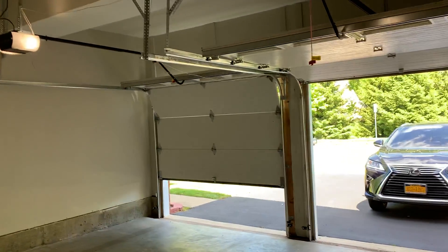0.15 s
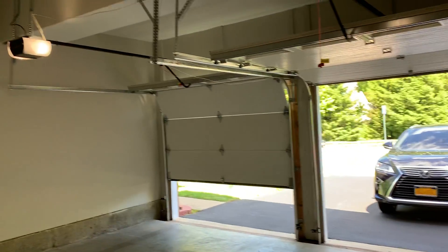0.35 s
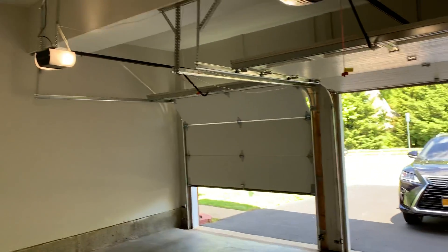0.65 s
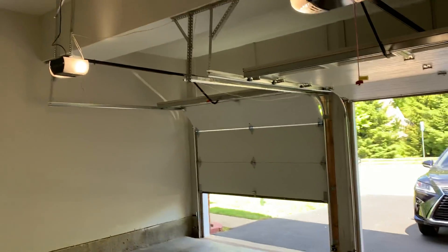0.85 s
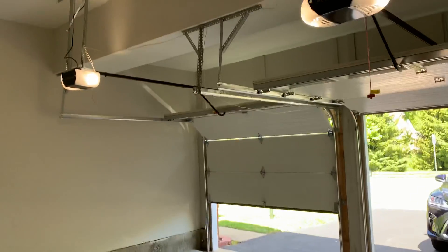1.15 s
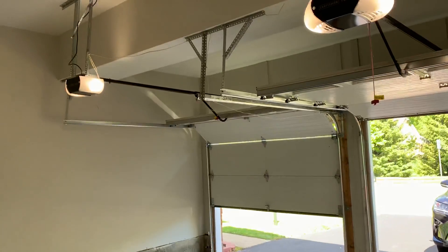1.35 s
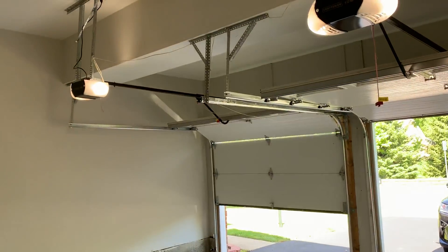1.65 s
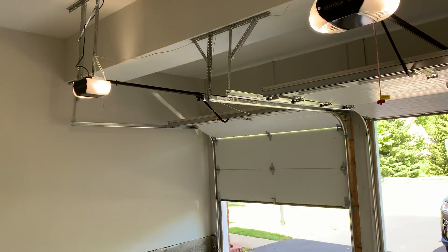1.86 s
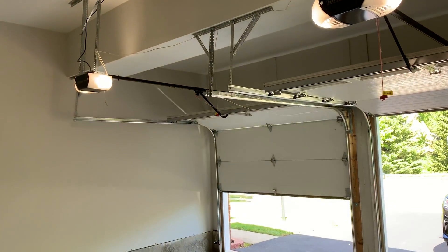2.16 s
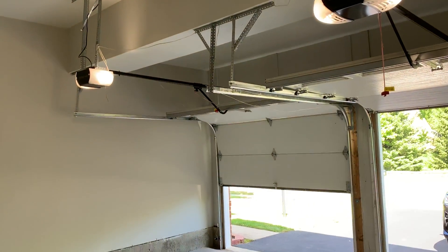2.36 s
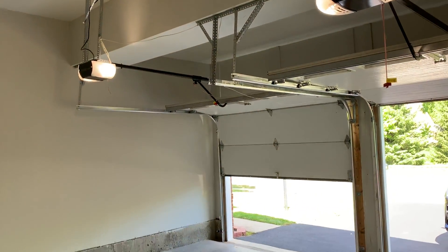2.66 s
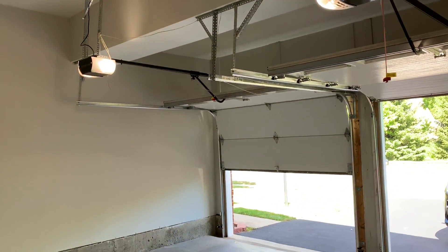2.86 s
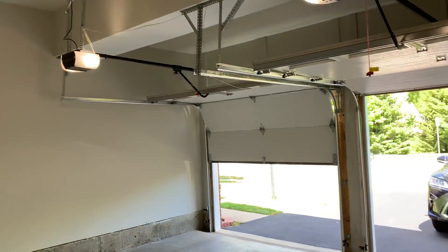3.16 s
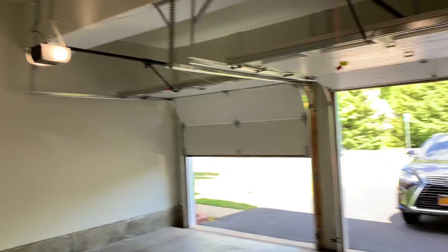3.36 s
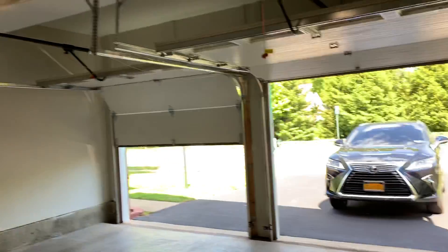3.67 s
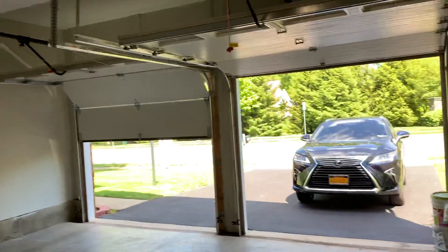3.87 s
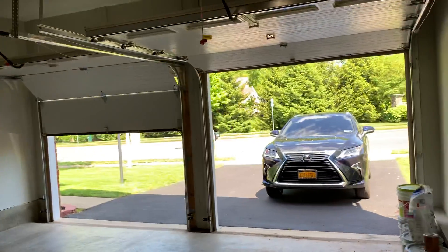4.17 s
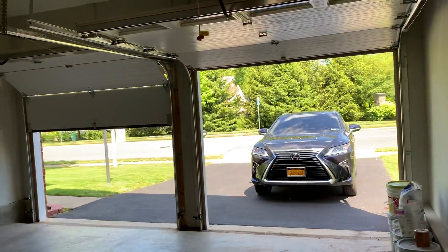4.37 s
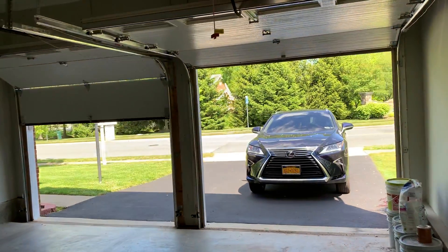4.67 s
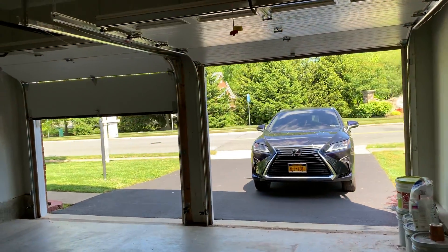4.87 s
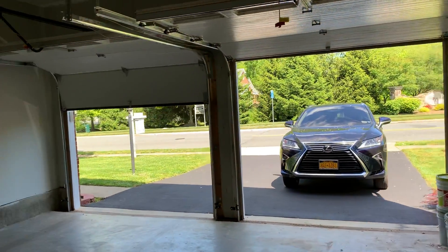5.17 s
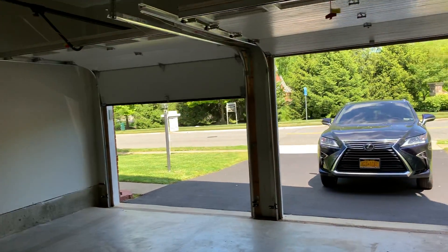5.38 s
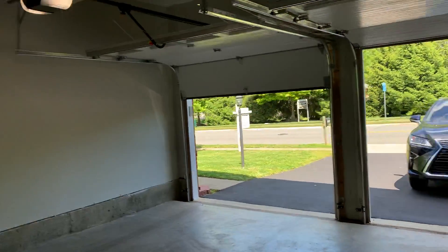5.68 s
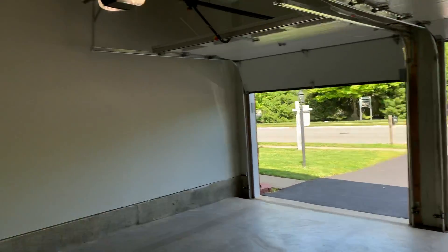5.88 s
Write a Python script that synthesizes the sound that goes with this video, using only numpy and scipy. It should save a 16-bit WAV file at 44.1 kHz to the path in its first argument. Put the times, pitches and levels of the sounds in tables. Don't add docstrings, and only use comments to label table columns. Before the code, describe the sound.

Inside a bare concrete garage, an electric opener drones on a steady low hum as a sectional door rolls upward. Rollers and track rumble with a fast throb and shuddering metallic hiss. Panels clack early, in the middle and late; a dry hinge squeals with a rising pitch around two seconds. The handheld stereo microphone turns, and the hum swells noticeably toward the end.

```python
import sys
import numpy as np
from scipy import signal
from scipy.fft import rfft, irfft, next_fast_len
from scipy.io import wavfile
from scipy.ndimage import uniform_filter1d

SR = 44100
rng = np.random.default_rng(int(sys.argv[2]) if len(sys.argv) > 2 else 0)


def unload_audio(sound):
    columns = np.transpose(np.atleast_2d(sound))
    steps = np.round(np.clip(columns, -1, 1) * 32767)
    wavfile.write(sys.argv[1], SR, steps.astype(np.int16))


def nominal_scale(level):
    x = np.asarray(level, float) / 20
    return 10 ** x


N = 266364
TIME, SIZE = np.arange(N) / SR, next_fast_len(N)
FREQ = np.fft.rfftfreq(SIZE, 1 / SR)


def unit(x):
    return x / np.sqrt(np.mean(x ** 2))


def on_log(table, hz):
    points_hz, values = np.transpose(table)
    return np.interp(np.log(np.maximum(hz, 1)), np.log(points_hz), values)


def columns(table):
    at_s, *rest = np.transpose(table)
    return [np.interp(TIME, at_s, column) for column in rest]


def walk(rate_hz):
    hold = int(SR / rate_hz)
    levels = np.repeat(rng.standard_normal(N // hold + 1), hold)
    slewed = uniform_filter1d(uniform_filter1d(levels, hold), hold)
    return 1.3 * slewed[:N]


def band(x, lo_hz, hi_hz):
    return signal.sosfilt(signal.butter(2, [lo_hz, hi_hz], "bandpass", fs=SR, output="sos"), x)


def motor(teeth):
    # start_s, hum_db, left_minus_right_db, place_half_waves (of the 2nd partial)
    phone = [(0.0, -23.5, -1.5, -.06), (.22, -22.3, -3.5, -.08), (.5, -27.5, -4.5, -.05),
             (.75, -28, 5, .07), (1.15, -24.5, 5, .12), (1.75, -23, 4.2, .3), (2.3, -22, 4.5, .5),
             (2.6, -21, 3.5, .66), (3.12, -24, 6, .76), (3.28, -22, 4.5, .81), (3.46, -24, 6, .84),
             (3.62, -21.3, 4.5, .86), (4.1, -22.5, 4, .875), (4.4, -20.5, 3, 1.0), (4.88, -15.5, 1.5, 1.14),
             (5.35, -14.5, 1, 1.5), (5.65, -14, 1, 1.72), (6.04, -13.6, .7, 1.92)]
    # multiple, level_db
    hum_upper = [(4, -55), (5, -52), (6, -53)]
    hum_hz = 119.9
    second_db, second_leak, second_pan = -29.5, 0.1, 0.54
    third_db, third_walk_db, third_leak = -37.5, 2, .42
    third_crest, third_span = .87, .14

    first_db, pan_db, place = columns(phone)
    third_wave = third_leak + (1 - third_leak) * np.exp(-((place - third_crest) / third_span) ** 2)
    turn = 2 * np.pi * hum_hz * TIME + 0.024 * walk(2.92) + np.array([[0], [.25]])
    side_db = np.array([pan_db, -pan_db]) / 2
    hum = nominal_scale(first_db + side_db) * (1 + 0.045 * teeth) * np.cos(turn)

    second = np.sin(np.pi * place) * np.cos(2 * turn) + second_leak * np.sin(2 * turn)
    hum += nominal_scale(second_db + second_pan * side_db) * (1 + 0.1 * teeth) * second

    third_level = nominal_scale(third_db + third_walk_db * walk(5)) * third_wave * (1 + 0.62 * teeth)
    hum += third_level * np.cos(3 * turn + 1.1 * walk(9))

    for multiple, level_db in hum_upper:
        level = nominal_scale(level_db + 2.5 * walk(4))
        hum += level * np.cos(multiple * turn + .7 * np.array([walk(5), walk(5)]))
    return -np.sqrt(2) * hum


def sprocket():
    sprocket_hz = 14.2
    return np.cos(2 * np.pi * sprocket_hz * TIME + .6 * walk(2))


def travel(teeth):
    # freq_hz, density_db_per_hz
    rolling = [(22, -30), (40, -5), (58, 1), (85, -1.9), (170, -3.5), (300, 1.35), (480, -4.5), (900, -7),
               (1800, -9.5), (3000, -15.5), (5000, -22), (7300, -29.5), (10300, -31.5), (15000, -37)]
    # freq_hz, width_hz, gain_db
    door = [(29.8, 10, 3), (100.5, 11, 6), (130, 38.7, 15.5), (240, 54, 9), (380, 30, 6.5), (630, 104, 3.5),
            (724, 43, 5), (1102, 300, 3.5), (3150, 550, 1), (6570, 600, 3.5), (8670, 1660, 6.5)]
    # start_s, load_db
    load = [(0.0, 1), (.15, -.5), (.36, -3.5), (.53, 2.5), (.85, -0.5), (1.5, 0), (1.76, 3.5), (1.95, 1.3),
            (2.3, 1.5), (2.9, -0.4), (3.42, 1), (3.8, -1), (4.1, -1), (4.4, 1.5), (4.85, -1), (5.15, -0.5),
            (5.6, -1), (6.04, 2)]
    roll_db, rail_rest_db, sprocket_depth = -37.5, -3, .13
    boom_share, scrape_share, hiss_share = 0.51, 0.64, 0.9
    shudder_scrape = 0.15

    (load_db,) = columns(load)
    rail_db = shudder() + rail_rest_db
    burst_db = 1.28 * rng.standard_normal(N // 32 + 1).repeat(32)[:N]
    grit = rng.standard_normal((2, N)) * nominal_scale(burst_db)
    grit += nominal_scale(-9) * rattle(count=2000)

    body_db = on_log(rolling, FREQ)
    for hz, width_hz, gain_db in door:
        body_db = body_db + gain_db / (1 + (2 * (FREQ - hz) / width_hz) ** 2)
    shaken = rfft(grit, SIZE) * nominal_scale(body_db)
    scale = np.std(irfft(shaken * ((FREQ > 420) & (FREQ < 1000)), SIZE))

    throb = sprocket_depth * (teeth + 0.16 * (2 * teeth ** 2 - 1))
    chatter_db = walk(8)
    octave, out = np.log2(np.maximum(FREQ, 1)), 0
    for centre in np.arange(4.5, 14.6, 1):
        window = np.cos(np.pi / 2 * np.clip(octave - centre, -1, 1)) ** 2
        part = irfft(shaken * window, SIZE)[:, :N]
        knots = [6.5, 8.5, 11, 12.5]
        boom = np.interp(centre, knots, [1, 0, 0, 0])
        scrape = np.interp(centre, knots, [0, 0, 1, 0])
        hiss = np.interp(centre, knots, [0, 0, 0, 1])
        share = 1 + boom * (boom_share - 1) + scrape * (scrape_share - 1) + hiss * (hiss_share - 1)
        tilt_db = share * load_db + (hiss + shudder_scrape * scrape) * rail_db
        flicker_db = (0.91 + 0.92 * hiss) * walk(9) + hiss * chatter_db
        throbbing = 1 + (hiss + 0.31 * scrape) * throb
        out = out + part * nominal_scale(roll_db + tilt_db + flicker_db) * throbbing
    return out / scale


def shudder():
    # start_s, rise_s, strength_db
    shudders = [(.05, 0.28, 10.5), (.6, .1, 4.5), (1.35, 0.16, 3.5), (1.7, 0.03, 3), (1.95, 0.16, 3.5),
                (2.15, 0.084, 3.5), (2.8, 0.066, 0), (3.15, 0.07, 5), (3.62, 0.068, 3), (3.975, .01, 10.5),
                (4.2, 0.13, 3), (4.36, 0.036, 2.5), (4.58, 0.034, 0.5), (5.15, 0.11, 1.5),
                (5.45, 0.27, 5.5)]
    total_db, fall_s = 0, 0.11
    for start_s, rise_s, strength_db in shudders:
        build = np.clip((TIME - start_s) / rise_s, 0, 1)
        decay = np.exp(-np.maximum(TIME - start_s - rise_s, 0) / fall_s)
        total_db = total_db + strength_db * build * decay
    return total_db


def rattle(count):
    place, pitch, size, *phases = rng.random((count, 5)).T
    age_s = np.arange(2600) / SR
    swell = np.sin(np.pi * age_s / age_s[-1]) ** 2
    starts, ring_hz = (place * N).astype(int), 350 + 11000 * pitch ** 2
    out = np.zeros((2, N + len(age_s)))
    for at, hz, level_db, left, right in zip(starts, ring_hz, 6 * size, *phases):
        turn = 2 * np.pi * (hz * age_s + np.array([[left], [right]]))
        out[:, at:at + len(age_s)] += nominal_scale(level_db) * (hz / 3000) ** .25 * np.sin(turn) * swell
    return unit(out[:, :N])


def knocks():
    # start_s, clack_db, ring_hz, ring_db (re clack), thud_db (re clack)
    panel_hits = [(.44, -26, 3600, -8, 7), (.462, -36, 1510, 0, 16), (.499, -34.5, 2730, 2, 24),
                  (.53, -33.5, 2110, -6, 16), (.575, -38, 2730, -8, 8), (1.573, -21, 4050, -9, -7),
                  (1.575, -33, 2480, 6, 4), (1.601, -28.5, 2330, -8, 9.5), (1.725, -27, 2980, -15, -5),
                  (1.742, -26, 2390, -6, -7), (1.83, -36, 611, 17, 8), (3.975, -34, 5780, -10, 9.5),
                  (4.399, -34, 3670, -1, 8), (4.44, -36.5, 3500, -4, -1), (4.545, -32.5, 2170, 1, 6.5),
                  (4.48, -27, 3250, -7, 11), (4.511, -30, 2650, -0.5, -2), (4.648, -33, 2460, 4, 0),
                  (4.962, -40, 3470, 8.5, 7), (4.968, -44, 2220, 12.5, 7), (5.733, -35.5, 3350, 5, -4),
                  (5.76, -33.5, 1830, 4.5, 3), (6.018, -40, 1860, -6, 23)]
    boom_hz, boom_db, boom_s = 76, 3, .04
    out, age_s = np.zeros(N + SR), np.arange(SR // 4) / SR
    for start_s, clack_db, ring_hz, ring_db, thud_db in panel_hits:
        noise = rng.standard_normal((4, len(age_s)))
        clack = unit(band(band(noise[0], 1500, 4700), 1200, 3120)) * np.exp(-age_s / 0.035)

        ring = band(noise[3], ring_hz / 1.04, ring_hz * 1.04)
        ring = ring / np.std(ring[:SR // 40]) * np.exp(-age_s / 0.028)

        thud = unit(band(noise[1], 50, 350)) * np.exp(-age_s / 0.023)
        thud = thud + nominal_scale(boom_db) * np.sin(2 * np.pi * boom_hz * age_s) * np.exp(-age_s / boom_s)

        tick = unit(band(noise[2], 4800, 13000)) * np.exp(-age_s / 0.014)
        tick_db = -20 + 16 * np.log2(ring_hz / 3000)

        knock = clack + nominal_scale(ring_db) * ring + nominal_scale(thud_db - 5) * thud + nominal_scale(tick_db) * tick
        at = int(start_s * SR)
        out[at:at + len(age_s)] += nominal_scale(clack_db - 11) * knock
    return out[:N]


def hinge():
    # start_s, length_s, first_slip_hz, last_slip_hz, level_db
    squeals = [
        (2.0, .035, 1810, 1850, -34),
        (2.02, .46, 1098, 1262, -31.5),
        (2.27, .44, 1280, 1362, -35),
    ]
    leaf_hz, leaf_width_hz, leaf_gain_db = 2390, 380, 13
    partial_step_db = -9
    rise, fall, bend = .3, .4, 1.1
    out, wobble = 0, 1 + 0.008 * walk(50) + .033 * walk(300)
    stutter_db = [4.6 * walk(90) for _ in range(3)]
    for start_s, length_s, first_hz, last_hz, level_db in squeals:
        done = np.clip((TIME - start_s) / length_s, 0, 1)
        slip_hz = first_hz + (last_hz - first_hz) * done ** bend
        turn = 2 * np.pi * np.cumsum(slip_hz * wobble) / SR
        grip = np.minimum(1, np.minimum(done / rise, (1 - done) / fall))
        for k in range(3):
            leaf_db = leaf_gain_db / (1 + (2 * ((k + 1) * slip_hz - leaf_hz) / leaf_width_hz) ** 2)
            partial_db = level_db - 4.5 + k * partial_step_db + leaf_db + stutter_db[k]
            out = out + grip * nominal_scale(partial_db) * np.sin((k + 1) * turn)
    return out


def garage(x, wet_db):
    t60_s = 0.81
    age_s = np.arange(SR // 2) / SR
    echoes = rng.standard_normal((2, len(age_s)))
    dull = uniform_filter1d(echoes, size=5)
    fall = np.exp(-np.log(1000) * age_s / t60_s)
    tail = (dull + (echoes - dull) * fall) * fall * (age_s > .004)
    tail = tail / np.sqrt(np.sum(tail ** 2, axis=1, keepdims=True))
    return x + nominal_scale(wet_db) * signal.fftconvolve(x[None], tail, axes=1)[:, :N]


def ports(pair):
    # freq_hz, share_0_to_1
    likeness = [(60, 0.7), (130, 0.86), (290, 0.55), (640, 0.21), (1400, 0.13), (5000, 0.11), (6500, 0.06),
                (7400, 1), (8500, 1), (16000, 0.76)]
    # freq_hz, left_minus_right_db
    lean_points = [(60, -5.5), (110, 8), (200, 8), (380, 1), (700, 2.5), (1290, 1), (2380, 0.5), (4400, -1),
                   (8120, -1.5), (15000, 2)]
    # freq_hz, half_turns
    port_turn = [(500, 0), (1600, 1), (4000, 2), (5300, 3), (6400, 4), (8600, 5), (11050, 6), (13400, 7),
                 (15750, 8)]
    left, other = rfft(pair, SIZE)
    share = np.clip(on_log(likeness, FREQ), 0, .995)
    lag = np.exp(1j * np.pi * np.interp(FREQ, *np.transpose(port_turn)))
    right = share * lag * left + np.sqrt(1 - share ** 2) * other
    lean = nominal_scale(on_log(lean_points, FREQ) / 2)
    return irfft(np.array([left * lean, right / lean]), SIZE)[:, :N]


def scene():
    teeth = sprocket()
    hum = motor(teeth)
    door = travel(teeth) + garage(hinge(), wet_db=-1) + garage(knocks(), wet_db=-1.5)
    return hum + ports(door)


def band_limit(x):
    return signal.sosfilt(signal.butter(12, 17110, fs=SR, output="sos"), x)


def record(dry):
    low_pass = signal.ellip(10, .2, 70, 15750, fs=SR, output="sos")
    mix = signal.sosfilt(low_pass, dry)
    return band_limit(mix)


dry = scene()
out = record(dry)
unload_audio(out)
```